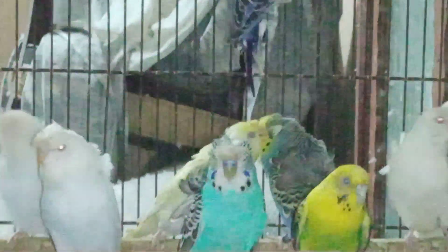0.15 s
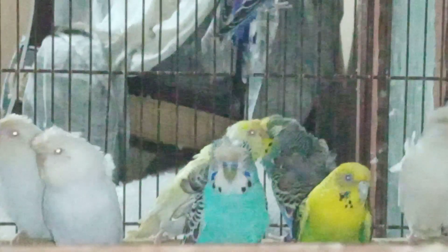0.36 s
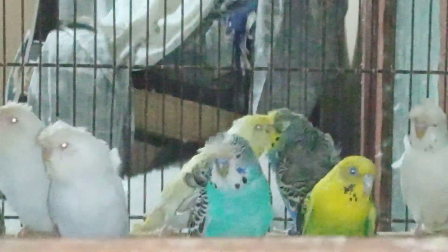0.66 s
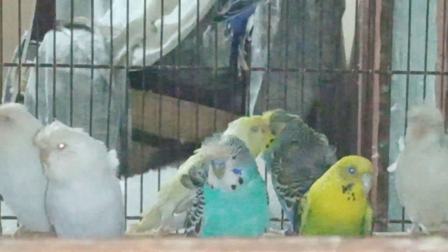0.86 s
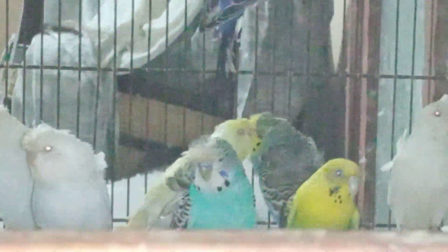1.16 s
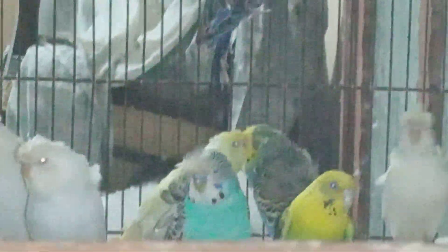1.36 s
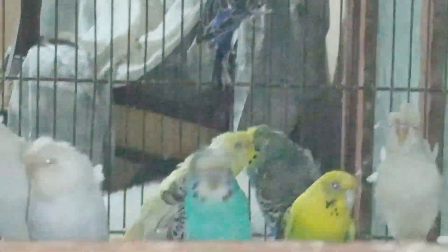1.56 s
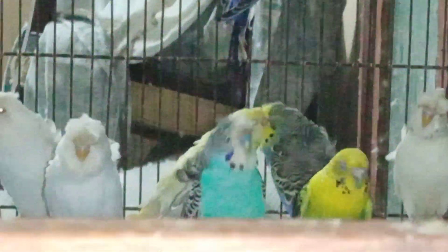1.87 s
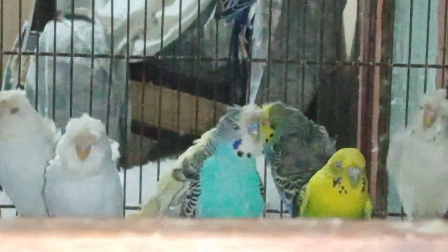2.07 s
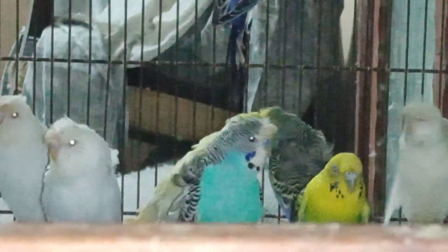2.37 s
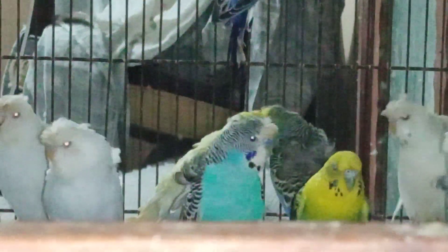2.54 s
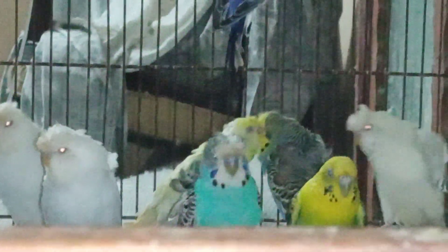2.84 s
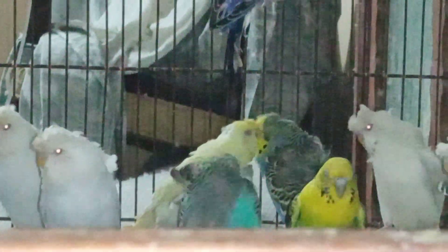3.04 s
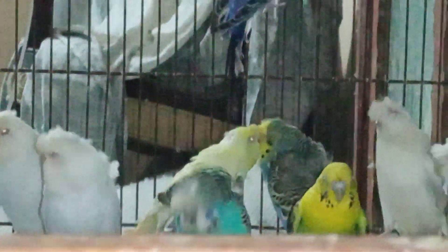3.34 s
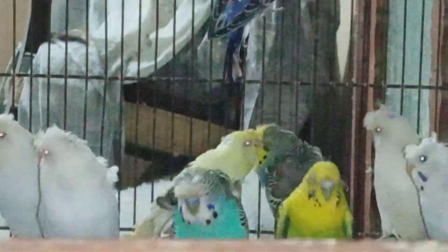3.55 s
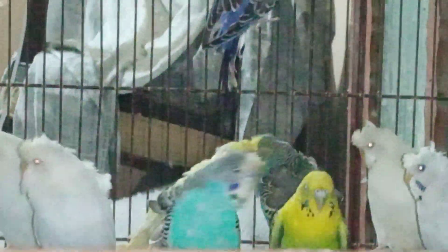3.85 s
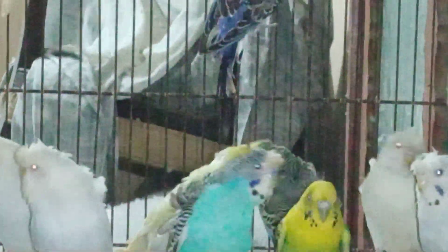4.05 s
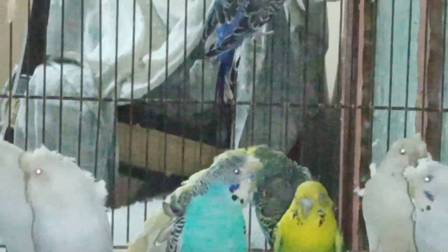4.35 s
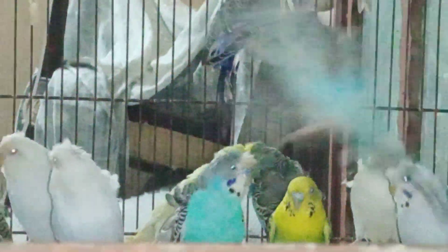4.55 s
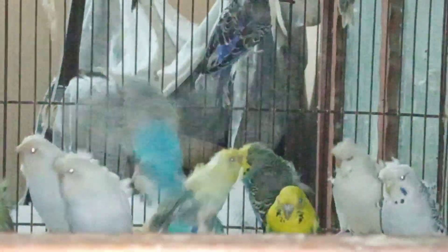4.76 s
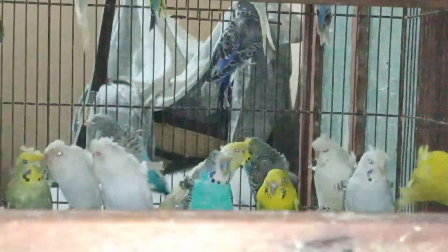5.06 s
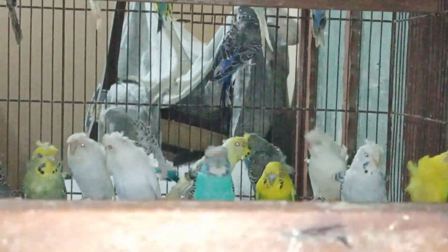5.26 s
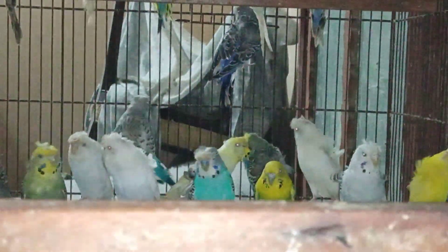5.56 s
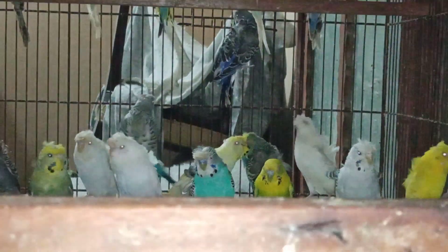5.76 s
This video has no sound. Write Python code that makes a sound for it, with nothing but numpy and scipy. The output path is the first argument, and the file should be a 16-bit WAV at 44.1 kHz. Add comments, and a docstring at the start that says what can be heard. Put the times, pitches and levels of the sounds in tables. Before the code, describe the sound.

A flock of budgerigars chatters in a small hard-walled aviary, heard in stereo from a phone close to the bars. A harsh squawk starts at once, and from 0.2 to 0.4 seconds a nearby bird runs quick, clear glides into a liquid warble. From about 0.55 to 3.1 seconds, hoarse whistled chirps in uneven syllables overlap with raspy squawks and fast buzzing trills, while birds behind mutter. Trills and squawks continue near 3.3, and a tight cluster of brighter chirps comes around 3.6 to 3.9. Feathery wing flutters swish between 4.1 and 4.6, with another brief one near 4.8, as the background chatter thins. Sparser, softer chirps follow, with light wire taps near 5.0 and 5.5 and faint perch bumps earlier. Squawks and chirps build again from 5.3, ending with a short warble near 5.85. Calls ring briefly over steady room noise and a faint wavering hum.

```python
"""A flock of budgerigars chatters in a small, hard-walled home aviary, heard by a phone at the cage bars.
One bird strings pure glides into a warble close by; others chirp in whistled syllables and buzz in fast trills.
Harsh squawks are slapping membranes ringing a throat, and short glides make a murmur further back.
Wingbeats are swished noise; taps and bumps are ringing noise bursts on the wire and perch.
The hard room rings after every call, over steady room noise and a low wavering hum."""
import sys
import numpy as np
from scipy import signal
from scipy.fft import rfft, irfft, next_fast_len
from scipy.io import wavfile

SR = 44100
rng = np.random.default_rng(int(sys.argv[2]) if len(sys.argv) > 2 else 0)


def master(y):
    """Save y as 16-bit WAV."""
    cut = np.clip(np.atleast_2d(y).T, -1, 1)
    pcm = np.round(cut * 32767)  # scale
    wavfile.write(sys.argv[1], SR, pcm.astype(np.int16))


N = 260631  # length in samples
T = np.arange(N) / SR  # time in seconds

# Levels in the rows are relative within a source, and lengths are nominal: each source scales its own.
# Glides of the near bird's warble. Each row: start in seconds, length in seconds, pitch at the start in Hz,
# pitch at the end in Hz, level in dB.
WARBLE_GLIDES = [(0.228, 0.0132, 3750, 4400, -18), (.238, 0.0156, 4260, 3200, -15.5),
                 (0.266, .006, 3310, 3540, -14), (.275, 0.012, 2450, 2870, -27),
                 (0.287, 0.0093, 2780, 4020, -20.5), (0.298, 0.0055, 3190, 2620, -20),
                 (0.308, .020, 2300, 2520, -20.5), (.330, .005, 1950, 2000, -17.5),
                 (.335, 0.0315, 3500, 3290, -15), (0.374, .026, 1856, 1914, -20.5),
                 (0.402, 0.0121, 2400, 3790, -22.5), (0.41, 0.0117, 3700, 3260, -21),
                 (5.818, .014, 2170, 2750, -33), (5.858, 0.01045, 4100, 4860, -29),
                 (5.881, 0.015, 3903, 3460, -17.5), (5.901, 0.0126, 3090, 3610, -20)]
# Hoarse chirps. Each row: start in seconds, length in seconds, pitch at the start in Hz, settled pitch in Hz,
# whistle level in dB, rasp level in dB, whistle's left minus right in dB.
CHIRP_NOTES = [(0.565, 0.088, 2887, 2748, -20.5, -22.5, 10), (0.834, 0.15, 3020, 2446, -22, -26, 9),
               (1.187, 0.13, 2638, 2717, -20.5, -24.5, 8), (1.425, 0.053, 4566, 2805, -27, -29.5, 0),
               (1.482, 0.098, 2580, 2632, -19.5, -24.5, 4.5), (1.675, 0.053, 3882, 2950, -26, -26, -6),
               (1.747, 0.046, 2860, 3000, -14.5, -26, 12.5), (1.809, 0.091, 3220, 2620, -21.5, -23.5, 4.5),
               (1.988, .053, 4601, 2795, -21, -27, -4.5), (2.037, .095, 2544, 2713, -20.5, -25, 3),
               (2.087, .04, 3293, 3355, -22.5, -32, -2), (2.379, 0.044, 2515, 2600, -24, -28, 3),
               (2.433, .15, 2885, 2744, -20, -29.5, -4.5), (2.808, 0.124, 2764, 2598, -21.5, -27.5, 2),
               (2.966, 0.11, 3940, 2425, -28, -27, 3), (3.6, .024, 3706, 3560, -13, -27, 3),
               (3.62, .02, 3650, 3670, -20, -27, 2), (3.65, 0.023, 3290, 2800, -18, -23, 1),
               (3.68, 0.066, 3750, 3580, -17, -25, 1.5), (3.801, 0.15, 4330, 2960, -23, -25.5, 2),
               (3.9, 0.092, 2997, 2508, -28, -24.5, 3), (4.5, .07, 3960, 3350, -27, -31.5, 3),
               (4.562, .045, 2950, 3205, -25.5, -34, -2), (4.603, .052, 3330, 3576, -22, -32, -1),
               (4.995, 0.042, 3300, 2790, -35, -39, 2), (5.131, 0.051, 3880, 3580, -27.5, -36.5, 4),
               (5.177, 0.044, 2684, 2420, -27, -34, -3), (5.313, 0.13, 3890, 2896, -34, -25, 7),
               (5.427, .13, 2986, 2482, -27, -27, 4), (5.732, 0.13, 2880, 2660, -19, -23.5, -8),
               (5.866, .05, 3890, 3010, -25.5, -25, 0)]
# Fast trills. Each row: start in seconds, length in seconds, pitch at the start in Hz, level in dB,
# left minus right in dB.
BUZZ_NOTES = [(0.766, .065, 3790, -31, 6), (1.012, 0.11, 4015, -21.5, 3.5), (1.886, 0.11, 5477, -27, -6),
              (2.186, 0.092, 4677, -27, -4), (2.571, 0.14, 4440, -22.5, -1.5), (2.659, .12, 4840, -24, -3),
              (2.803, .077, 3900, -24, 1), (3.274, .075, 5270, -29, -7.5), (3.52, 0.067, 4850, -30, -4),
              (3.659, 0.09, 3490, -26, 7), (3.762, 0.04, 5636, -26.5, -5.5), (3.976, 0.058, 4067, -21, 2),
              (4.759, 0.12, 5290, -28, -7.5), (4.764, .06, 2730, -31, -4), (5.335, 0.079, 3890, -26.5, 2),
              (5.495, 0.0485, 5480, -28.5, -8)]
# Harsh scolding notes. Each row: start in seconds, length in seconds, throat resonance in Hz, level in dB,
# treble in dB.
SQUAWK_NOTES = [(0, 0.19, 4170, -31, -4.5), (0.549, 0.18, 3140, -27.5, -5), (0.792, 0.063, 3710, -26, -5),
                (0.923, 0.073, 2800, -24, -5), (1.036, .087, 3280, -30, -0.5),
                (1.31, 0.11, 3470, -29.5, -6.5), (1.687, 0.18, 2700, -28.5, -6),
                (1.904, 0.083, 3800, -32, 2), (2.204, 0.081, 3560, -32.5, 3),
                (2.309, 0.099, 3290, -24, -4.5), (2.677, 0.1, 3419, -26.5, -7.5),
                (3.057, 0.091, 3590, -27.5, -1), (3.265, 0.11, 2760, -29.5, -7.5),
                (3.492, 0.068, 3410, -27.5, -7), (3.609, .091, 3220, -27.5, -6.5),
                (5.495, 0.055, 2580, -28, -6), (5.6, 0.054, 3520, -28, -10.5),
                (5.794, .083, 2200, -24.5, -22)]
# Overlapping far chatter. Each row: time in seconds, level in dB.
CROWD_LEVEL = [(0, -30), (.2, -35.5), (.3, -27), (.48, -32.5), (1.4, -30), (2.3, -26), (3.2, -32.5),
               (3.9, -27.5), (4.45, -45), (5.28, -52), (5.4, -39.5), (5.9, -31.5)]
# Bursts of wingbeats. Each row: start in seconds, length in seconds, feather level in dB, air puff level in dB.
FLIGHT_BURSTS = [(4.113, 0.23, -26.5, -50), (4.301, 0.15, -31.5, -44.5), (4.484, 0.14, -27, -46.5),
                 (4.766, 0.1, -31, -62)]
# Beak or claw on the bars. Each row: start in seconds, level in dB.
BAR_TICKS = [(4.989, -28.5), (5.498, -25)]
# Soft bumps on the perch. Each row: start in seconds, level in dB.
PERCH_BUMPS = [(1.61, -44), (2.129, -47), (2.191, -39), (4.054, -41), (4.28, -44), (4.399, -57)]
# What the throat and beak pass. Each row: frequency in Hz, gain in dB.
THROAT_OUTLINE = [(700, -32), (1400, -15.5), (2000, -1.5), (3000, 0), (4200, -3.5), (5500, -6), (8500, 7.5),
                  (12000, -1.5), (16000, -14)]
# Feathers brushing the air. Each row: frequency in Hz, gain in dB.
FEATHER_OUTLINE = [(300, -32), (1200, -20), (2000, -4), (3400, 0), (6000, -3.5), (9000, -12), (16000, -29)]
# Steady room noise. Each row: frequency in Hz, gain in dB.
AIR_OUTLINE = [(25, -43), (50, -16.5), (80, -8), (140, 0), (260, 1.5), (340, -5), (480, -7.5), (700, -3),
               (1000, -9.5), (1600, -10.5), (3000, -11), (6000, -26.5), (16000, -45.5)]
# Hum of the room. Each row: frequency in Hz, level in dB.
HUM_TONES = [(102.3, -54.5), (161.5, -49.5), (248, -56), (302, -55.5), (667.5, -53)]
# Colour of the phone's microphone. Each row: frequency in Hz, gain in dB.
MIC_OUTLINE = [(1000, 1), (5800, 0.5), (7200, -5.5), (8600, 2.5), (10000, 1), (11500, -6.5), (13800, 2.5),
               (15200, 9.5)]

TOP_HZ = 15950  # the microphone's upper limit
# echoes and tail, against the direct sound
NEAR_EARLY_DB, NEAR_TAIL_DB = -13, -14
WHISTLE_EARLY_DB, WHISTLE_TAIL_DB = -9, -7
# left minus right of the near bird and of the scolding birds
NEAR_PAN_DB, SCOLD_PAN_DB = 1.2, -2
# time in which a chirp slides to its settled pitch, and its nominal syllable rate
SETTLE_S, SYLLABLE_HZ = 0.04, 33.03
TRILL_CLIMB_OCT_PER_S = 1.1  # octaves per second


def undb(db):
    """Decibels to gain."""
    return 10 ** (np.asarray(db) / 20)


def unit(x):
    """Scale to rms 1."""
    return x / np.sqrt(np.mean(x ** 2) + 1e-18)


def colour(x, points):
    """Filter by a (Hz, dB) outline, joined by lines over log frequency."""
    n = x.shape[-1]
    size = next_fast_len(n + 256)
    hz, db = np.transpose(points)
    f = np.fft.rfftfreq(size, 1 / SR)
    gain = undb(np.interp(np.log(f + 1), np.log(hz), db))
    return irfft(rfft(x, size) * gain, size)[..., :n]


def resonance(x, hz, width_hz):
    """Two-pole band-pass, gain 1 at the centre."""
    return signal.lfilter(*signal.iirpeak(hz, hz / width_hz, fs=SR), x)


def wander(n, rate):
    """Random values joined by lines, rate a second, spread near 1."""
    at = np.arange(n) * rate / SR
    return np.interp(at, np.arange(4096), rng.standard_normal(4096)) * np.sqrt(3 / 2)


def swell(n, edge):
    """A note's envelope: it opens and closes over a share of its length."""
    return signal.windows.tukey(n, np.clip(edge, 0, 1))


def push(n, rise, fall):
    """A call's envelope: it grows and dies in quarter sines, each over its own share of the length."""
    u = np.linspace(0, 1, n)
    growing = np.sin(np.pi / 2 * np.clip(u / rise, 0, 1))
    return growing * np.sin(np.pi / 2 * np.clip((1 - u) / fall, 0, 1))


def add(out, x, s, pan_db=0, spread=1):
    """Place a sound: each side of the microphone has its own gain and its own small random delay."""
    for side, lag, sign in zip(out, rng.integers(0, 18, 2), (1, -1)):
        i = min(max(int(s * SR), 0) + int(lag * spread), N)
        gain = undb(sign * pan_db / 2) / np.sqrt(np.cosh(pan_db * np.log(10) / 10))
        side[i:i + len(x)] += x[:N - i] * gain


def syrinx(hz, overtone_db, fall_db):
    """A membrane swinging almost as a sine, with weak overtones."""
    phase = 2 * np.pi * np.cumsum(hz) / SR
    overtones = 0
    for k in range(2, 5):
        audible = k * hz < SR / 2
        overtones = overtones + undb(overtone_db + fall_db * (k - 2)) * np.sin(k * phase) * audible
    return np.sqrt(2) * (np.sin(phase) + overtones)


def warble(gain_db=-0.6, rough=0.048, overtone_db=-25, low_note_db=18, upper_fall_db=-13, arch=0.0413,
           pure_db=-13):
    """The near bird strings arched glides together: loud notes are purer, soft ones hoarse, low ones reedy."""
    out = np.zeros((2, N))
    for s, length, first_hz, last_hz, db in WARBLE_GLIDES:
        n = int(length * SR * 1.16)
        hz = np.linspace(first_hz, last_hz, n) * (1 + arch * np.sin(np.linspace(0, np.pi, n)))
        hoarse = np.clip((pure_db - db) / 9, 0.08, 1)
        reedy = np.clip((2800 - hz) / 900, 0, 1)
        hz = hz * (1 + rough * hoarse * wander(n, 1810))
        voice = syrinx(hz, overtone_db + low_note_db * reedy, upper_fall_db)
        voice = voice * undb(db + gain_db + 4.0 * hoarse * wander(n, 700))
        add(out, voice * swell(n, edge=0.17), s, NEAR_PAN_DB, spread=0)
    return colour(out, THROAT_OUTLINE)


def chirp_pitch(n, first_hz, settled_hz):
    """A chirp slides quickly from its first pitch and levels off."""
    return settled_hz + (first_hz - settled_hz) * np.exp(-T[:n] / SETTLE_S)


def chirps(gain_db=-3.0, waver=0.023, rasp=0.018, flutter_db=3, scoop=0.08, step=0.03594,
           syllable_db=3.0, half_db=-17, peak_early=0.71):
    """Whistles in uneven upward-scooping syllables; soft ones waver, rasp and crack into the octave below."""
    out = np.zeros((2, N))
    for s, length, first_hz, settled_hz, db, _, pan_db in CHIRP_NOTES:
        n = int(length * SR * 1.04)
        hoarse = np.clip((-13.5 - db) / 9, 0.35, 1.3)
        # number of the syllable, and the share of it gone by
        pace = np.cumsum(np.exp(0.344 * wander(n, 39.85)))
        syllables = max(round(length * SYLLABLE_HZ), 1)
        which, through = np.divmod(pace / (pace[-1] + 1) * syllables, 1)
        # each syllable draws its own pitch and strength
        lift, accent = rng.uniform(-np.sqrt(3), np.sqrt(3), (n, 2))[which.astype(int)].T
        hz = chirp_pitch(n, first_hz, settled_hz) * (1 + hoarse * (step * lift + scoop * (through - 0.5)))
        hz = hz * (1 + hoarse * (waver * wander(n, 245.6) + rasp * wander(n, 2223)))
        whistle = syrinx(hz, overtone_db=-36.5, fall_db=-33)
        octave_below = undb(half_db) * hoarse * wander(n, 102) * np.sin(np.pi * np.cumsum(hz) / SR)
        shape = np.sqrt(np.sin(np.pi * through ** peak_early))
        strength = undb(syllable_db * accent + hoarse * flutter_db * wander(n, 221))
        note = (whistle + octave_below) * shape * strength
        add(out, unit(note) * undb(db + gain_db), s, pan_db, spread=0.4)
    return colour(out, THROAT_OUTLINE)


def buzzes(gain_db=-1, trill_hz=190, depth=0.054, rasp=0.026):
    """A climbing whistle shaken in pitch and strength by an uneven fast trill."""
    out = np.zeros((2, N))
    for s, length, first_hz, db, pan_db in BUZZ_NOTES:
        n = int(length * SR * 0.883)
        trill = 2 * np.pi * np.cumsum(trill_hz * (1 + 0.251 * wander(n, 202.3))) / SR
        climb = 2 ** (TRILL_CLIMB_OCT_PER_S * T[:n])
        hz = first_hz * climb * (1 + depth * np.sin(trill) + rasp * wander(n, 2500))
        note = syrinx(hz, overtone_db=-14.5, fall_db=-8)
        note = note * undb(2.4 * np.cos(trill) + 2 * wander(n, 117)) * push(n, rise=0.25, fall=0.29)
        add(out, unit(note) * undb(db + gain_db), s - 0.004, pan_db)
    return out


def harsh_note(n, throat_hz, bright_db, pulse_hz=380, jitter=0.3, puff=0.71, width_hz=1300, voiced_db=-3,
               leap=0.15):
    """Membranes slap shut irregularly and ring the throat; a broken whistle leaps about its resonance."""
    pace = np.exp(jitter * wander(n, 350) + 0.2 * rng.standard_normal())
    cycles = np.cumsum(pulse_hz * pace) / SR
    slaps = unit(np.diff(np.floor(cycles), prepend=0))
    opening = np.exp(-(cycles % 1) / 0.39)
    breath = unit(opening * rng.standard_normal(n))
    effort = undb(2.65 * wander(n, 112)) * push(n, rise=0.064, fall=0.25)
    source = (slaps + 2 * puff * breath) * effort
    throat = resonance(resonance(source, throat_hz, width_hz), throat_hz, 1.15 * width_hz)
    windpipe = resonance(resonance(source, 1820, 1000), 2140, 1750)  # its lower mode
    body = throat + undb(-4.5) * windpipe
    whistle = syrinx(throat_hz * np.exp(leap * wander(n, 260)), overtone_db=-15.5, fall_db=-26)
    whistle = whistle * (0.5 + opening) * effort
    edge = colour(source, [(2500, -72), (4200, 2), (5600, 3.0), (8500, -8.0), (11000, -11.5), (16000, -22)])
    return unit(unit(body) + undb(voiced_db) * unit(whistle)) + undb(bright_db) * unit(edge)


def squawks(gain_db=-1.5, treble_db=4, chirp_rasp_db=-2, chirp_treble_db=-17, throat_share=0.97):
    """Bright scolding notes, and the duller rasp in each chirp, whose throat is tuned near the whistle."""
    out = np.zeros((2, N))
    for s, length, throat_hz, db, bright_db in SQUAWK_NOTES:
        note = harsh_note(int(length * SR * 1.246), throat_hz, bright_db + treble_db)
        add(out, note * undb(db + gain_db), s - 0.011, SCOLD_PAN_DB)
    for s, length, first_hz, settled_hz, _, db, _ in CHIRP_NOTES:
        n = int(length * SR * 1.08)
        throat_hz = throat_share * np.median(chirp_pitch(n, first_hz, settled_hz))
        note = harsh_note(n, throat_hz, chirp_treble_db)
        add(out, note * undb(db + chirp_rasp_db), s, SCOLD_PAN_DB)
    return colour(out, [(500, 2), (1100, -1), (1600, 0.0), (16000, -0.5)])


def wings(beat_hz=17, beat_db=3):
    """Each downstroke swishes the feathers and pushes a soft puff of air."""
    out = np.zeros((2, N))
    for s, length, feather_db, puff_db in FLIGHT_BURSTS:
        n = int(length * SR)
        stroke = np.cos(2 * np.pi * np.cumsum(beat_hz * (1 + 0.22 * wander(n, 19))) / SR)
        feathers = colour(rng.standard_normal(n), FEATHER_OUTLINE)
        swish = unit(feathers * undb(beat_db * stroke + 1.5 * wander(n, 504)))
        low_air = resonance(resonance(rng.standard_normal(n), 81, 110), 89, 160)
        puff = unit(low_air * undb(4.4 * stroke))
        beats = swish * undb(feather_db) + puff * undb(puff_db)
        add(out, beats * swell(n, edge=0.3), s, pan_db=-1.5)
    return out


def ticks(decay_s=0.0027):
    """A dry tap that briefly rings the cage wire."""
    out, t = np.zeros((2, N)), T[:SR // 20]
    for s, db in BAR_TICKS:
        tap = rng.standard_normal(len(t)) * np.exp(-t / decay_s)
        ring = resonance(tap, 3500, 900) + resonance(tap, 4800, 860) + resonance(tap, 5800, 1350)
        add(out, ring * undb(db), s)
    return out


def bumps(hz=120, width_hz=110, decay_s=0.013, pan_db=-4):
    """A dull knock that dies within a few swings."""
    out, t = np.zeros((2, N)), T[:SR // 8]
    for s, db in PERCH_BUMPS:
        knock = rng.standard_normal(len(t)) * np.exp(-t / decay_s)
        thud = resonance(resonance(knock, hz, width_hz), hz, 2 * width_hz)
        add(out, unit(thud) * undb(db), s, pan_db)
    return out


def crowd(count=420, gain_db=0.0):
    """Birds further back mutter short, hoarse glides at random."""
    out = np.zeros((2, N))
    for when, span, pitch, bend, side in rng.random((count, 5)):
        n = int((0.01987 + 0.06 * span) * SR)
        glide = (bend - 0.5) * np.linspace(-0.4, 0.4, n)
        hz = 1750 * 3 ** pitch * np.exp(glide + 0.1209 * wander(n, 1900))
        note = syrinx(hz, overtone_db=-18.5, fall_db=-11) * swell(n, edge=0.3)
        add(out, note, when * N / SR - 0.03, 10 * (side - 0.55))
    level_db = np.interp(T, *np.transpose(CROWD_LEVEL))
    return unit(colour(out, THROAT_OUTLINE)) * undb(level_db + gain_db)


def room(x, early_db, tail_db, t60_s=0.61, treble_t60_s=0.33, early_s=0.026):
    """Close walls throw back a cluster of echoes, then a diffuse tail whose treble dies first."""
    t = T[:int(0.6 * SR)]
    noise = rng.standard_normal((2, len(t)))
    low = signal.sosfilt(signal.butter(2, 5500, fs=SR, output="sos"), noise)
    # the treble takes the other side's noise
    high = signal.sosfilt(signal.butter(2, 5500, "high", fs=SR, output="sos"), noise[::-1])
    tail = low * np.exp(-np.log(1000) * t / t60_s) + high * np.exp(-np.log(1000) * t / treble_t60_s)
    tail = tail * np.clip(t / 0.0076, 0, 1)
    sparse = rng.standard_normal(noise.shape) * (rng.random(noise.shape) < 0.03)
    early = sparse * np.exp(-t / early_s) * (t > 0.0015)
    response = (undb(early_db) * unit(early) + undb(tail_db) * unit(tail)) / np.sqrt(len(t))
    return signal.fftconvolve(x, response, axes=1)[:, :N]


def background(air_db=-36.0, hum_db=-1):
    """Room noise from shared and opposed parts, its rumble stronger on the right, and wavering hum tones."""
    mid, side = rng.standard_normal((2, N))
    side = colour(side, [(30, -7), (70, 2.5), (130, -23.0), (280, -7.5), (600, -7), (1200, 2.5)])
    air = unit(colour(mid + side * np.array([[1], [-1]]), AIR_OUTLINE)) * undb(1.55 * wander(N, 5.62))
    left = colour(air[0], [(30, -11), (70, -8), (140, -2.5), (500, 0)])
    right = colour(air[1], [(30, 2), (70, 2), (140, 0.58), (500, 0.065)])
    hum = np.zeros(N)
    for hz, db in HUM_TONES:
        level = np.sqrt(2) * undb(db + hum_db + 2.7 * wander(N, 7))
        hum += level * np.sin(2 * np.pi * np.cumsum(hz * (1 + 0.0247 * wander(N, 30))) / SR)
    return np.array([left, right]) * undb(air_db) + hum


def scene():
    """Whistlers sit near the microphone; scolding birds come about as strongly off the walls as directly."""
    near, whistles = warble(), chirps()
    scolding = squawks() + buzzes() + crowd() + wings()
    birds = near + room(near, NEAR_EARLY_DB, NEAR_TAIL_DB)
    birds = birds + whistles + room(whistles, WHISTLE_EARLY_DB, WHISTLE_TAIL_DB)
    birds = birds + undb(-2.0) * scolding + room(scolding, early_db=-7.0, tail_db=-4.0)
    return birds + ticks() + bumps() + background()


def record(dry):
    """The phone's microphone colours the treble and cuts the top."""
    top_cut = signal.ellip(10, 0.2, 80, TOP_HZ, fs=SR, output="sos")
    return signal.sosfilt(top_cut, colour(dry, MIC_OUTLINE))


dry = scene()
out = record(dry)
master(out)
```